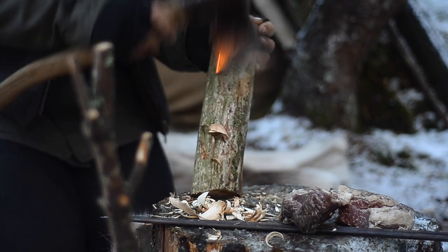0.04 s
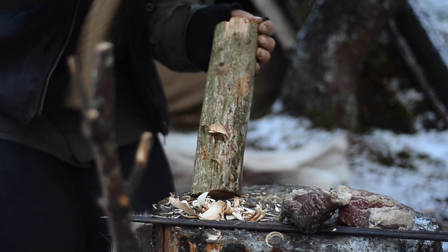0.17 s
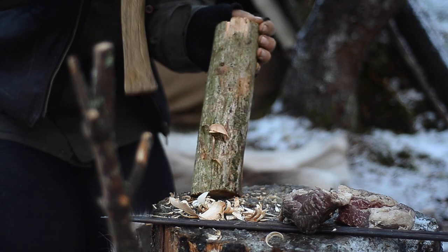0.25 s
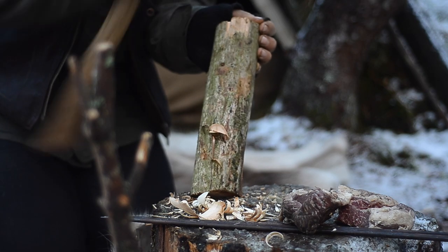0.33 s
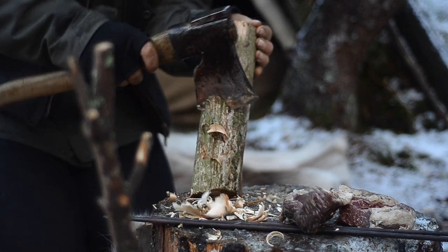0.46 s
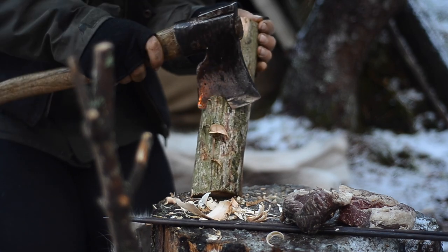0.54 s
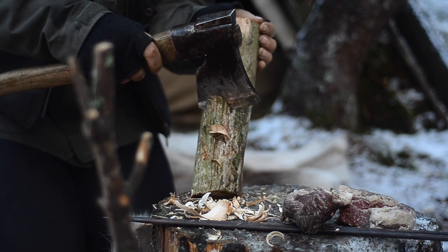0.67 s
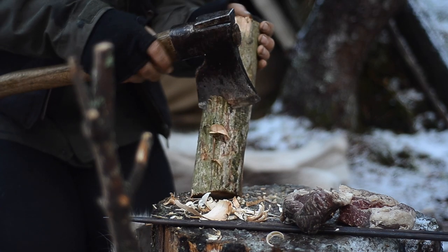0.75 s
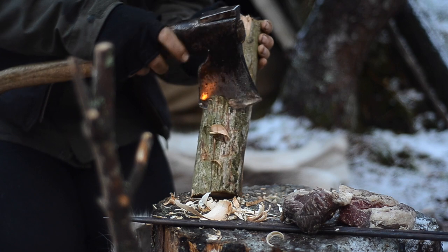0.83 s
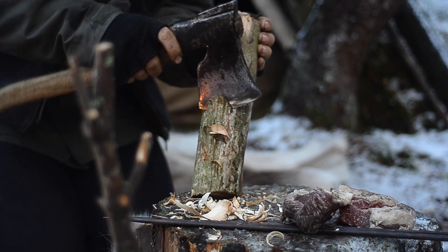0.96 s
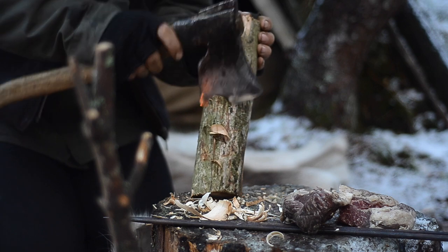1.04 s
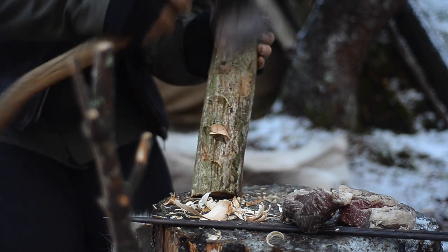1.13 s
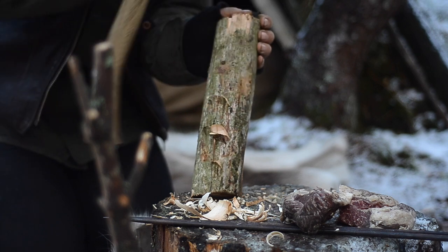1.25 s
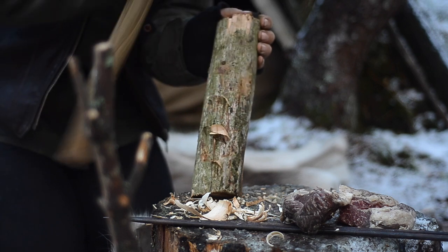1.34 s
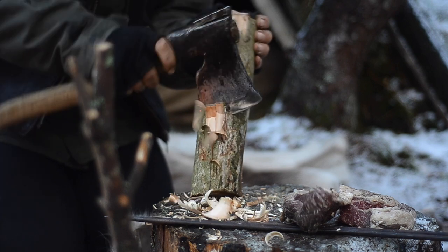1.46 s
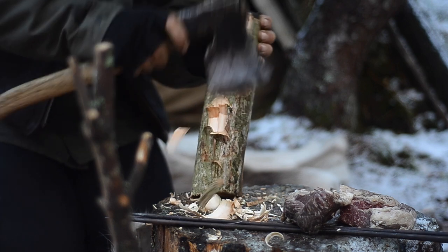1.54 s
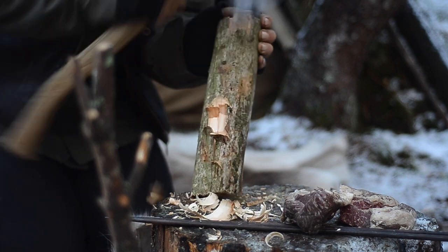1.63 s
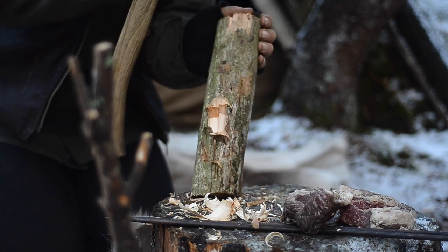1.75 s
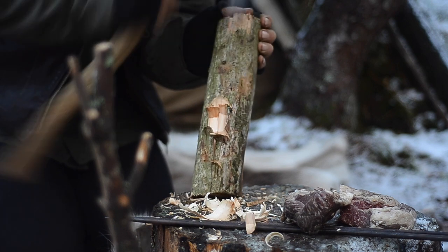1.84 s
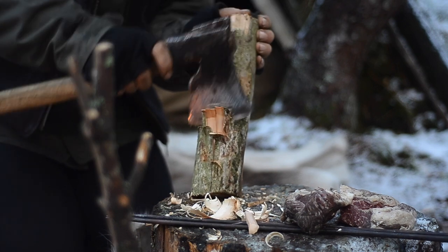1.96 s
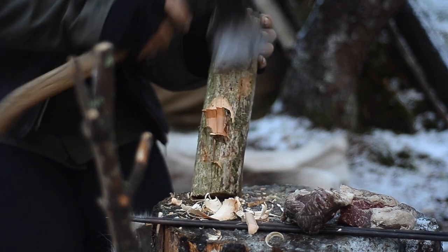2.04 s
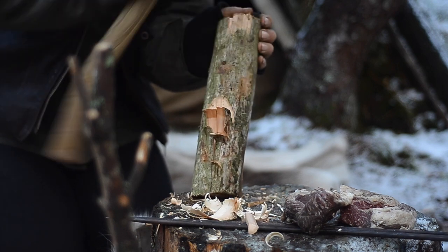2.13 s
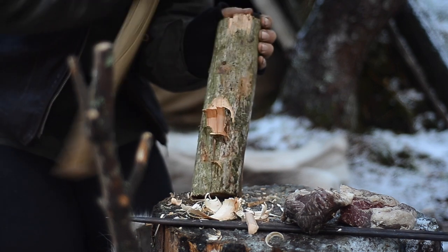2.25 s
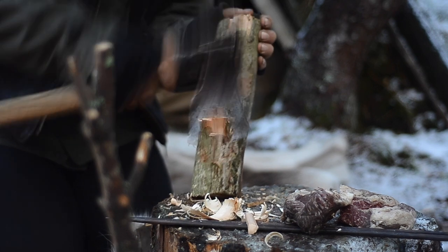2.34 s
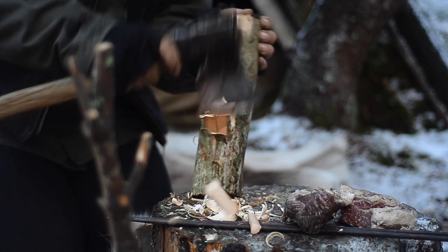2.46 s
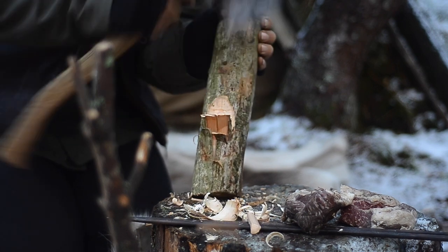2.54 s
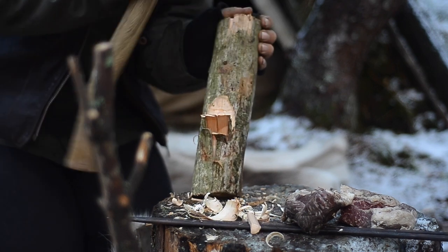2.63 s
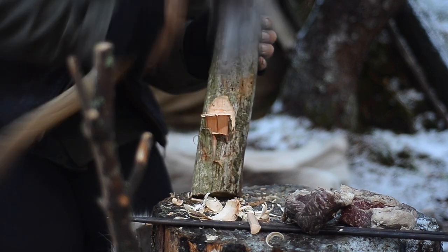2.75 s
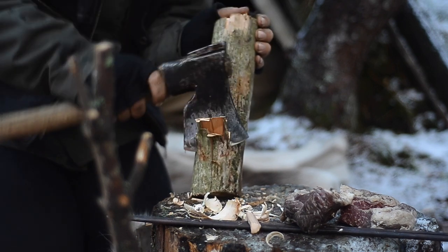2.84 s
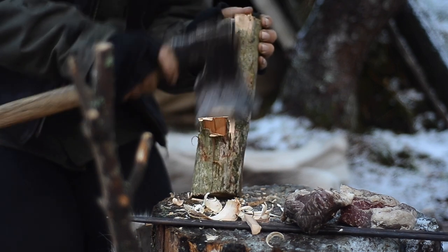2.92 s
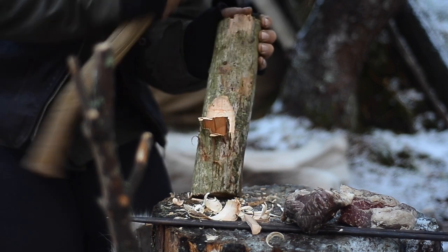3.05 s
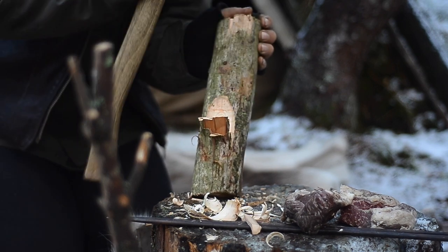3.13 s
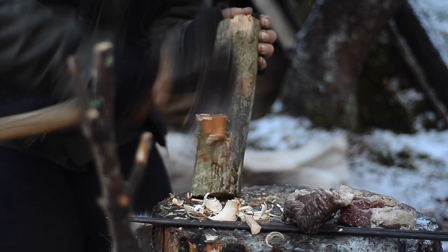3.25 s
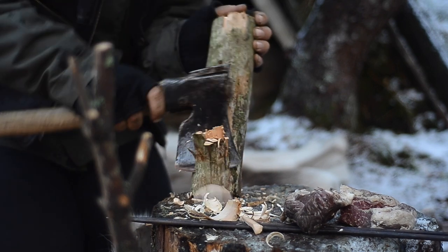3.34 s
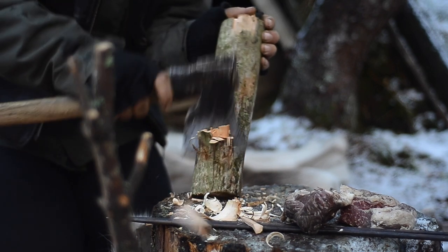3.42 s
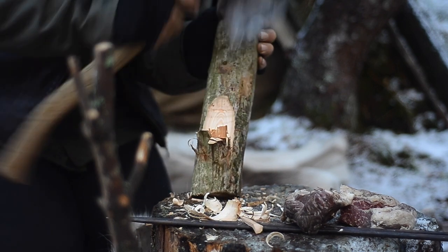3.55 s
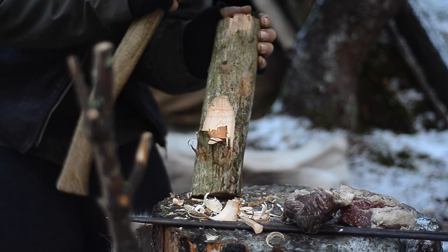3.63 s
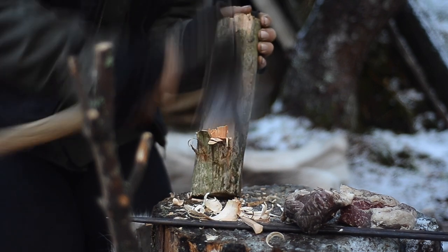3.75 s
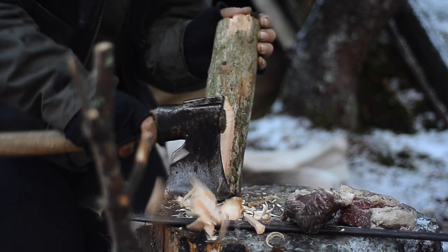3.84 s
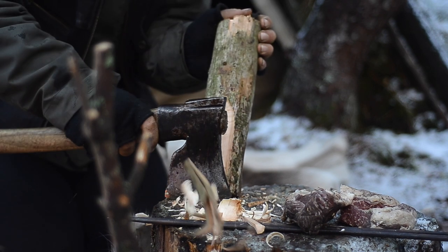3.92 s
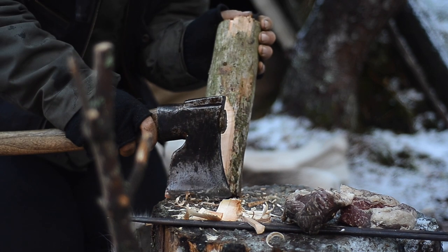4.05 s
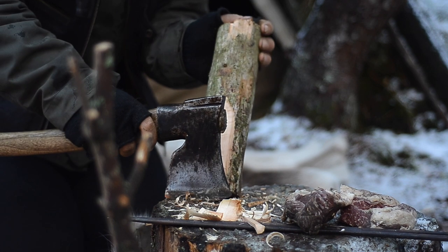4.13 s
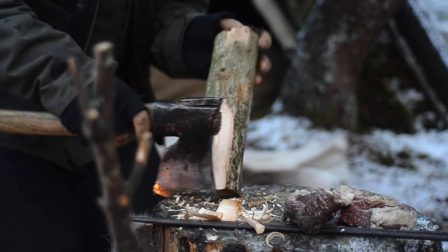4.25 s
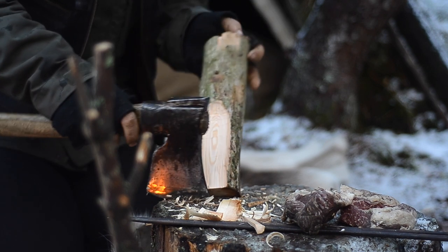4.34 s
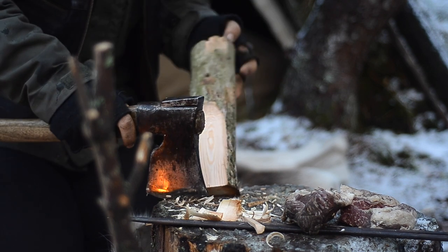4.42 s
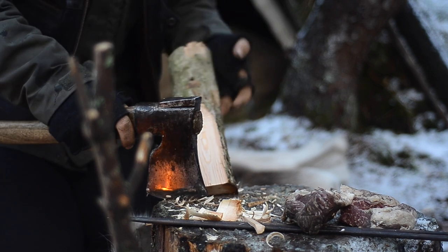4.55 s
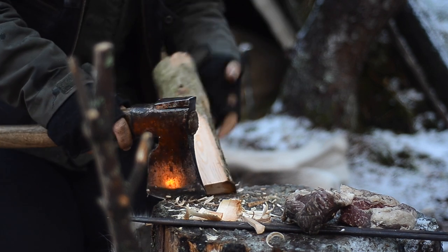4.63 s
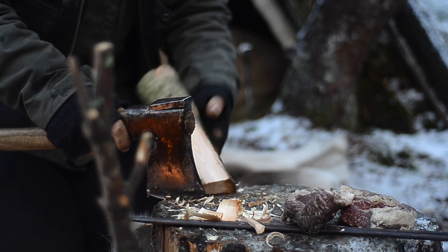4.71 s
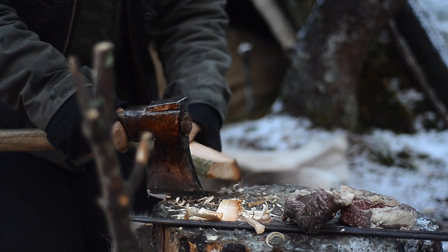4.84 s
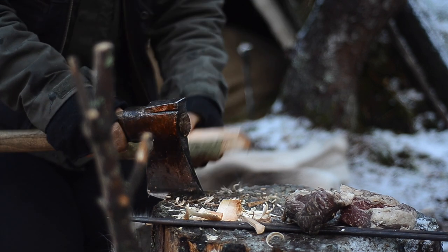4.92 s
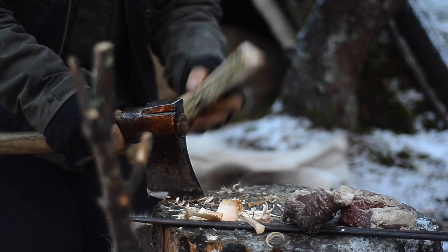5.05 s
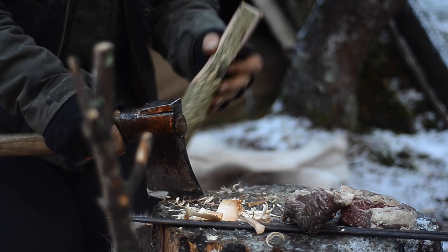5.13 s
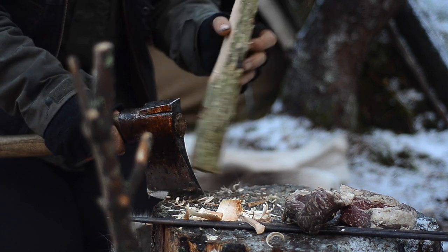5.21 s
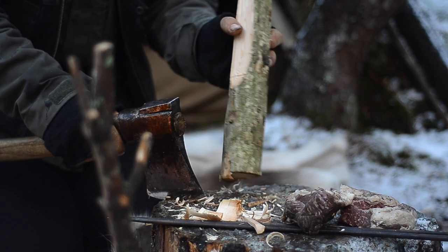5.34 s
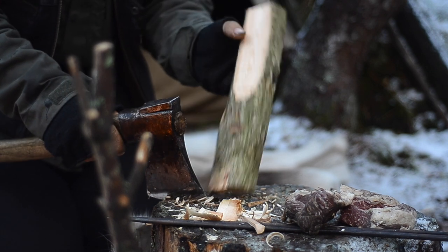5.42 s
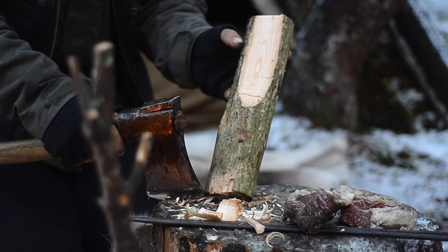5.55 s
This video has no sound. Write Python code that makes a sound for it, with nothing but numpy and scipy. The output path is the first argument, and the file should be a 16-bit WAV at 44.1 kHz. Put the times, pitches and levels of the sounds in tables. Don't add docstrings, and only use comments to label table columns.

```python
import sys
import numpy as np
from scipy import signal
from scipy.fft import rfft, irfft, next_fast_len
from scipy.io import wavfile
from scipy.ndimage import uniform_filter1d, minimum_filter1d, map_coordinates

SR = 44100
rng = np.random.default_rng(int(sys.argv[2]) if len(sys.argv) > 2 else 0)


def linear_from_db(decibels):
    return 10 ** (np.asarray(decibels, float) / 20)


def dump(signal):
    limited = np.clip(np.atleast_2d(signal).T, -1, 1)
    pcm = np.round(limited * 32767).astype(np.int16)
    wavfile.write(sys.argv[1], SR, pcm)


N = 246078
SPAN, SHORT = 28672, 6144

# (time [s], ground thump [dB], rattle [dB])
BLOW_EVENTS = [
    (0.082, -54, -48),
    (0.4565, -23, -26),
    (1.4879, -22.5, -25.5),
    (1.9510, -23.5, -26.5),
    (2.413, -25, -27),
    (2.858, -29.5, -26.5),
    (3.3282, -34, -27),
    (3.84, -34.5, -24),
    (3.86, -23.5, -30.5),
]
# (frequency [Hz], density [dB per Hz])
HISS_COLOUR = [(500, 1), (1500, 6.5), (3500, -2.5), (8000, -14.5), (12000, -18), (15000, -18.5),
               (16500, -31.5)]


def along(points, hz):
    f, v = np.transpose(points)
    return np.interp(np.log(hz + 1), np.log(f + 1), v)


def noise(spectrum, size):
    gain = linear_from_db(along(spectrum, np.fft.rfftfreq(size, 1 / SR)))
    x = irfft(rfft(rng.standard_normal(size)) * gain, size)
    return x / np.std(x)


def decay(t60_s, rise_s, size=SHORT):
    t = np.arange(size) / SR
    return (1 - np.exp(-t / abs(rise_s))) * linear_from_db(-60 * t / abs(t60_s))


def tone(hz, phase=0, size=SHORT):
    return np.sin(2 * np.pi * hz * np.arange(size) / SR + phase)


def wobble(rate_hz, size):
    knots = rng.standard_normal(int(size * rate_hz / SR) + 4)
    return map_coordinates(knots, [np.arange(size) * rate_hz / SR])


def add(track, s, sound):
    track[round(s * SR):][:len(sound)] += sound


def click(spectrum):
    cepstrum = irfft(np.log(linear_from_db(along(spectrum, np.fft.rfftfreq(SHORT, 1 / SR)))), SHORT)
    cepstrum[1:SHORT // 2] *= 2
    cepstrum[SHORT // 2:] = 0
    pulse = irfft(np.exp(rfft(cepstrum)), SHORT)
    return pulse / np.abs(pulse).max()


def crack(db, knock_db, bass_db, treble_db, t60_s):
    band = [(120, knock_db - 9.0), (600, knock_db + 12.0), (1030, bass_db + 4.0), (1750, bass_db + 16.0),
            (3000, 1), (4800, -1.5), (8500, treble_db + 7.5), (16000, treble_db - 5.5)]
    spike = np.interp(db, [-26, -8], [.4, 1])
    shape = linear_from_db(-6.0) * decay(t60_s * .5, 0.00018) + linear_from_db(-16.5) * decay(t60_s * 2.5, 0.00022)
    rattle = (1.5 - .8 * spike) * noise(band, SHORT) * shape
    return -linear_from_db(db + 5.0) * (spike * click(band) + rattle)


def air():
    # (time [s], far rush [dB], near hiss [dB])
    levels = [(0, -51.5, -65.5), (0.299, -52.5, -65), (.75, -52.5, -64), (1.0, -52.5, -65.5),
              (1.3, -53, -65), (1.8, -54, -62.5), (2.25, -54, -67), (2.499, -53.5, -64.5), (3.1, -54, -68),
              (3.7, -52.5, -71.5), (4.301, -54, -62), (4.9, -53.5, -64.5), (5.58, -53.5, -64.5)]
    # (frequency [Hz], density [dB per Hz])
    rush_colour = [(12, -18), (30, -6), (124, 1.5), (370, -3), (740, 0), (1100, -7.5), (2500, -25.5),
                   (6600, -90)]
    down_s, settle_s, lift_s, full_swing_db = .2, .12, .3, -40
    s, rush_db, hiss_db = np.transpose(levels)
    t = np.arange(N) / SR
    hits = [hit for hit, thump_db, _ in BLOW_EVENTS if thump_db > full_swing_db]
    swing = np.max([np.interp(t - hit, [-down_s, .07, 0.039 + settle_s], [0, 1, 0]) for hit in hits], axis=0)
    lift = sum(np.exp(-((t - hit - lift_s) / 0.33) ** 2) for hit in hits)
    rush_db = np.interp(t, s, rush_db) + 3 * swing + 3.5 + .9 * wobble(7, N)
    rush = linear_from_db(rush_db) * noise(rush_colour, N)
    sparks = (rng.random(N) < 45 / SR) * linear_from_db(8 * rng.random(N))
    crackle = 1 + .7 * np.convolve(sparks, decay(.008, .0002)[:600])[:N]
    hiss_db = np.interp(t, s, hiss_db) + 7.5 * swing + 1.5 * np.minimum(lift, 1) + 3 + 1.1 * wobble(5.3, N)
    return rush + linear_from_db(hiss_db) * noise(HISS_COLOUR, N) * crackle


def embers():
    per_s, base_db, spread_db = 45, -62, 6
    out, draw = np.zeros(N + SHORT), rng.random((300, 4))
    times = np.cumsum(-np.log(draw[:, 0]) / per_s)
    for s, (_, pitch, size, life) in zip(times, draw):
        if s < N / SR:
            hz = 3000 * 4 ** pitch
            level_db = base_db - spread_db * np.log(size) / 2
            t60_s = (2.5 + 30 * life ** 3) / hz
            add(out, s, linear_from_db(level_db) * tone(hz, size=512) * decay(t60_s, .00003, size=512))
    return out[:N]


def fire():
    # (time [s], peak [dB], treble [dB])
    snaps = [(0.0108, -35, -17), (.496, -31, -14), (.633, -37, -5), (0.759, -32.5, -16), (.982, -43.5, -21),
             (1.2364, -45, -2), (1.3982, -42, -12), (1.6761, -45, -18), (1.6933, -33, -10),
             (2.0776, -29.5, -8.5), (2.1093, -37, -21.5), (2.7744, -43, 7.5), (3.037, -37.5, -4.5),
             (3.1045, -38.5, -22), (3.2325, -38, -16.5), (3.468, -31, -18), (3.966, -34, -12),
             (3.4978, -39.5, -33), (3.5957, -35, -23), (4.3075, -45, -14), (4.348, -27.5, -7),
             (4.3577, -40, -18), (4.4329, -36.5, -14.5), (4.572, -43, -4), (4.708, -38.5, -13),
             (4.8, -42, -9), (5.043, -35, -15), (5.0791, -30, -16), (5.112, -38, -10.5),
             (5.3237, -40.5, -26)]
    # (time [s], peak [dB])
    ticks = [(0.2652, -45), (0.5999, -49), (0.701, -50), (0.8325, -44.5), (0.881, -53.5), (0.9554, -56.5),
             (1.1074, -54), (1.1444, -54), (1.2795, -49), (1.7958, -41), (2.2079, -47.5), (3.087, -46.5),
             (3.1487, -48.5), (3.2894, -51), (2.151, -49), (2.191, -51), (2.642, -41), (3.638, -39),
             (4.203, -47), (3.7468, -43), (4.6705, -56.5), (4.778, -41.5), (4.8191, -47), (4.877, -48.5),
             (4.9075, -52), (5.229, -48), (5.2527, -43), (5.2765, -48)]
    out = np.zeros(N + SPAN)
    for s, db, treble_db in snaps:
        add(out, s + .0007, crack(db, -12.5, -7, treble_db, 0.0062))
    for s, db in ticks:
        add(out, s + .0007, crack(db - 2, -30, -13, -10.5, 0.006))
    return out[:N]


def rubs():
    # (time [s], level [dB], length [s])
    scrapes = [(0.081, -38, 0.005), (1.208, -49, 0.021), (1.611, -42.5, .009), (2.843, -54, 0.0067),
               (4.067, -43, 0.0056), (4.085, -44.5, 0.01), (4.214, -40.5, 0.018), (4.231, -41, 0.011),
               (4.287, -43, 0.012), (4.298, -45.5, 0.013), (5.547, -42.5, 0.0097), (5.5646, -49, 0.0052)]
    # (time [s], level [dB], pitch [Hz], length [s])
    squeaks = [
        (4.675, -53, 1750, .025),
        (4.738, -49, 1710, .032),
    ]
    out, t = np.zeros(N + SPAN), np.arange(SHORT) / SR
    for s, db, length_s in scrapes:
        stroke = np.sin(np.pi * np.clip(t / length_s, 0, 1))
        add(out, s, linear_from_db(db + 5.3 * wobble(340, SHORT)) * noise(HISS_COLOUR, SHORT) * stroke)
    for s, db, hz, length_s in squeaks:
        stroke = np.sin(np.pi * np.clip(t / length_s, 0, 1))
        add(out, s, linear_from_db(db) * tone(hz, 1.7 * wobble(103, SHORT)) * stroke)
    return out[:N]


def pings():
    # (time [s], peak [dB], pitch [Hz])
    splinter_pings = [(.4965, -25, 4050), (.603, -50, 11500), (.586, -54, 10000), (.736, -49, 3800),
                      (.778, -48, 3400), (.909, -47, 3300), (1.022, -50, 3700), (1.123, -55, 7500),
                      (1.19, -52, 5200), (1.221, -48, 8500), (1.221, -46, 3500), (1.255, -53, 8300),
                      (1.717, -34, 754), (1.7375, -48, 4300), (1.7375, -53, 8000), (2.4652, -25, 1250),
                      (2.686, -40, 3500), (2.686, -39, 1910), (3.4385, -36, 4400), (3.447, -30, 3250),
                      (3.498, -45, 4000), (3.6472, -28, 2500), (3.695, -32.5, 1200), (4.3075, -34, 5100),
                      (4.41, -50, 8000), (4.423, -50, 10500), (4.475, -55, 9800), (4.48, -50, 4270),
                      (4.49, -52, 6500), (4.519, -44, 3490), (4.793, -52, 10460), (5.325, -41, 1500),
                      (5.425, -50, 3500)]
    out = np.zeros(N + SPAN)
    for s, db, hz in splinter_pings:
        add(out, s, linear_from_db(db) * tone(hz) * decay(15 / hz, .0001))
    return out[:N]


def chips():
    # (time [s], peak [dB], knock [dB], bass [dB], treble [dB])
    landings = [(0.505, -26.5, -14, -14.5, -19), (1.2101, -29, -27, -9, -15), (1.6135, -31, -14, -13, -28),
                (1.716, -29, 12, 8, -21), (1.7612, -31, -7.5, -3.5, -32), (2.0301, 0.5, -11, -6.5, -23),
                (2.0384, -22.5, 5, -5, -20), (2.4652, -18.5, -0.5, -12, -8), (2.5415, -28.5, 9.5, -3, -29),
                (2.6343, -34, 5.5, -1, -19), (2.818, -23.5, -11, -14, -14), (3.4376, -21, -11, 4, -23),
                (3.4461, -30, -13, -12.5, -11.5), (3.5751, -1.5, -8.5, -9, -15),
                (3.6218, -4, -13.5, -10.5, -21.5), (3.5841, -27, -11, -10, -25),
                (3.6302, -32, -14.5, -5, -25), (3.624, -15, -23, -8, -4), (3.6464, -24, -35, -7, -21),
                (3.696, -26, -6, -9.5, -35), (3.819, -28.5, -9.5, -16, -25), (4.0693, -18.5, 3, -5, -14),
                (4.092, -24, 11, -14, -10.5), (4.1699, -23.5, -17, -18.5, -25),
                (4.5096, -21.5, -36, -14, -16), (5.5183, -28, 12, -18, -35.5),
                (5.5767, -23.5, -6, -10, -19)]
    out = np.zeros(N + SPAN)
    for s, *colour_db in landings:
        add(out, s + .0007, crack(*colour_db, 0.0064))
    return out[:N]


def splinters():
    under_rattle_db, mean_delay_s, lowest_hz, t60_s = -9.5, .045, 1000, 0.38
    out = np.zeros(N + SPAN)
    for s, _, rattle_db in BLOW_EVENTS:
        for wait, pitch, size in rng.random((50, 3)):
            delay_s = .012 - mean_delay_s * np.log(1 - wait)
            hz = lowest_hz * 6 ** pitch
            level_db = rattle_db + under_rattle_db - 4 * np.log(1 - size) - 60 * delay_s / t60_s
            add(out, s + delay_s, linear_from_db(level_db) * tone(hz, size=512) * decay(5 / hz, .00005, size=512))
    return out[:N]


def trees(x):
    # (frequency [Hz], t60 [s])
    fading = [(200, 0.22), (2000, 0.058), (10000, 0.17)]
    hz, t, z = signal.stft(rng.standard_normal(SR // 2), SR, nperseg=256)
    tail = signal.istft(z * linear_from_db(-60 * t / along(fading, hz)[:, None]), SR, nperseg=256)[1]
    return signal.fftconvolve(np.pad(x, (150, 0)), tail / np.linalg.norm(tail))[:N]


def ground():
    # (frequency [Hz], level [dB], arrival [s], spread [s])
    waves = [(57, -1.5, .0750, .045), (105, -4, .0570, .022), (85, -5, .1080, .018), (60, -12, .1430, .03),
             (175, -7, .0360, .012), (75, -6, .0300, .015), (95, -20, .1900, .03), (53, -26, .2750, .07)]
    # (frequency [Hz], density [dB per Hz])
    rattle_colour = [(120, -31), (200, 4.5), (459, -13.5), (775, -3.5), (2600, -10), (4470, -19),
                     (7550, -28.5), (15000, -46)]
    out, t = np.zeros(N + SPAN), np.arange(SPAN) / SR
    for s, thump_db, rattle_db in BLOW_EVENTS:
        start = linear_from_db(thump_db) * decay(4.3, .0037, size=SPAN)
        for hz, db, arrival_s, spread_s in waves:
            packet = np.exp(-((t - arrival_s) / spread_s) ** 2) * np.cos(2 * np.pi * hz * (t - arrival_s))
            add(out, s, linear_from_db(db + 1.5 * wobble(30, SPAN)) * packet * start)
        grain_db = 1.2 * wobble(70, SPAN) + 2.8 * wobble(500, SPAN)
        resonances = linear_from_db(3.5 * wobble(700, SPAN // 2 + 1))
        loose = irfft(rfft(noise(rattle_colour, SPAN)) * resonances, SPAN)
        loose = loose / np.std(loose) * decay(0.31, 0.0048, size=SPAN)
        add(out, s, linear_from_db(rattle_db - 2.5 + grain_db) * loose)
    return out[:N]


def creaks():
    # (time [s], level [dB], pitch [Hz], t60 [s])
    splits = [(.472, -18.5, 800, .04), (0.506, -36, 1700, .06), (.535, -29.5, 766, 0.087),
              (1.538, -35, 900, 0.055), (1.4, -29, 1200, 0.036), (1.614, -27, 1165, 0.034),
              (1.7155, -25, 970, 0.023), (1.966, -21, 1400, .03), (1.998, -32, 830, .05),
              (2.429, -33, 1200, .05), (2.876, -23.5, 1700, 0.047), (2.905, -38, 1590, .1),
              (3.357, -27, 1900, .08), (3.358, -24, 1490, .04), (3.38, -31.5, 1850, 0.18),
              (3.4375, -18, 1360, 0.026), (3.853, -13.5, 1900, 0.025), (3.876, -18, 910, 0.037),
              (3.905, -37.5, 1800, 0.1)]
    out = np.zeros(N + SPAN)
    for s, db, hz, t60_s in splits:
        rough_db = 5 * wobble(420, SHORT)
        add(out, s, linear_from_db(db + rough_db) * tone(hz, 1.8 * wobble(330, SHORT)) * decay(t60_s, .003))
    return out[:N]


def lone_modes():
    # (time [s], level [dB], pitch [Hz], t60 [s])
    rings = [
        (.529, -44, 6622, .3),
        (.556, -46, 6622, .26),
        (3.934, -58, 4630, .5),
        (3.934, -44, 2875, .12),
        (3.94, -46, 3400, .09),
        (3.91, -50, 5905, .16),
        (2.484, -40, 4048, .06),
    ]
    out = np.zeros(N + SPAN)
    for s, db, hz, t60_s in rings:
        add(out, s, linear_from_db(db + wobble(60, SPAN)) * tone(hz, size=SPAN) * decay(t60_s, 0.0016, size=SPAN))
    return out[:N]


def steel():
    # (time [s], ring [dB], then poll, cheek, edge modes against it [dB])
    freed = [
        (0.5277, -47, 9.5, -3, -6),
        (0.553, -46, 8, -13, -5),
        (1.559, -46.5, 11.5, -4, 3),
        (2.044, -61.5, 13, 6, 9),
        (2.4819, -39, 2, -6, -13),
        (2.924, -40, 5.5, -4, -5),
        (3.3941, -38.5, -6.5, -3, 8.5),
        (3.908, -36, -16, -17, -0.5),
        (3.936, -48, 10, -14, 4.5),
    ]
    # (time [s], level [dB])
    swing_back = [
        (.5520, -39.5),
        (1.5585, -52),
        (2.044, -56),
        (2.4824, -36),
        (2.925, -51),
        (3.3945, -57.5),
        (3.9072, -46),
    ]
    # (frequency [Hz], level [dB], t60 [s])
    body = [(7390, 0, .18), (7870, -14, .12), (8180, -18, .28), (5910, -5, .14), (8420, -12, .1)]
    poll = [(2880, -10, .12), (3290, -9, .08), (3690, -13, .15), (4050, -5, .13), (4590, -3, .07),
            (4630, -28, .45), (4985, -8, .09)]
    cheek = [(6622, 0, .15)]
    edge = [(8786, -4, .1), (9830, -16, .2), (10430, -21, .14), (12340, -19, .2), (12810, -14, .09),
            (13250, -19, .1), (15370, -24, .14)]
    eye = [(11320, -17, .9)]
    rings = [(s, db, eye) for s, db in swing_back]
    for s, db, *family_db in freed:
        for family, extra_db in zip([body, poll, cheek, edge], [0] + family_db):
            rings.append((s, db + extra_db, family))
    out = np.zeros(N + SPAN)
    brushing = decay(.6, .0001, size=SPAN)
    for s, db, family in rings:
        for hz, mode_db, t60_s in family:
            size = SPAN if t60_s > .4 else SPAN // 3
            flutter = 2 * (7000 / hz) ** .3 * wobble(150, size) * brushing[:size]
            level_db = db + mode_db + rng.normal(0, 1) + flutter
            ring = tone(hz, 0.2 * flutter, size=size) * decay(t60_s, 0.0014, size=size)
            add(out, s, linear_from_db(level_db) * ring)
    rasp_colour = [(1500, 0.0), (4000, 6.0), (9000, -15.0), (15000, -11.0)]  # (Hz, dB)
    for s, db, *_ in freed:
        add(out, s, linear_from_db(db + 1.5) * noise(rasp_colour, SHORT) * decay(0.054, 0.00063))
    return out[:N]


def fibres():
    # (time [s], level [dB], centre [Hz], t60 [s], treble an octave up [dB])
    tears = [(0.46, 1, 1900, 0.015, -10.5), (.4595, 11, 3700, 0.012, -16), (1.4881, 1, 1600, 0.021, -11.5),
             (1.49, 10.5, 3900, 0.012, -14.5), (1.5076, -16, 1410, .012, -5),
             (1.9515, 6.5, 3900, 0.019, -16.5), (1.958, 5.5, 4010, 0.0048, -17),
             (1.969, -21, 3200, .03, -21.5), (2.4005, -0.5, 2600, 0.018, -18.5),
             (2.4114, 10, 4450, 0.0072, -21), (2.416, -2.5, 3000, 0.027, -14.5),
             (2.855, 1.5, 3000, 0.028, -10), (2.8640, 8.5, 3300, 0.011, -17.5),
             (2.871, 2, 4100, 0.0062, -9), (2.882, -17.5, 3600, 0.018, -14), (3.3285, 11, 1880, 0.022, -8),
             (3.34, -6, 2900, 0.035, -14.5), (3.842, 5, 2590, 0.02, -11.5),
             (3.8480, -4, 2010, 0.033, -12.5), (3.863, -4.5, 1700, 0.011, -18.5),
             (3.8654, -0.5, 2600, 0.0082, -14.5), (.085, -24, 3500, 0.013, -13),
             (5.5423, -27, 2800, 0.021, -11), (5.52, -36.5, 3200, 0.029, -17)]
    out = np.zeros(N + SPAN)
    for s, db, hz, t60_s, treble_db in tears:
        band = [(hz / 4, -11), (hz, 0), (hz * 2, treble_db), (hz * 4, treble_db - 13.5), (18000, -34)]
        spiky_db = db - 8.0 + 2.6 * wobble(590, SHORT)
        add(out, s, linear_from_db(spiky_db) * noise(band, SHORT) * decay(t60_s, 0.0005))
    return out[:N]


def slaps():
    # (time [s], level [dB], pitch [Hz], t60 [s])
    hits = [(0.4599, -2, 1900, .012), (1.4872, 3, 819.5, 0.028), (1.4894, 2, 1149, .015),
            (1.5075, -16.5, 1250, 0.014), (2.3997, 6, 830, 0.026), (2.411, 0, 1450, .015),
            (2.4113, -3, 4550, 0.0093), (2.8547, 9, 811, .024), (2.8553, -3, 1499, .015),
            (3.3282, 3.5, 946, 0.013), (3.3291, 3.5, 1833, .018), (3.343, -10, 2810, .012),
            (3.8416, 5, 1216, 0.013), (3.8684, 4, 762, .02)]
    out = np.zeros(N + SPAN)
    for s, db, hz, t60_s in hits:
        add(out, s, linear_from_db(db) * tone(hz) * decay(t60_s, 0.00026))
    return out[:N]


def thuds():
    # (time [s], level [dB], pitch [Hz], t60 [s])
    hits = [(0.087, -15.5, 320, 0.043), (0.1007, -13.5, 306, 0.015), (0.457, -8.5, 104, 0.11),
            (.4600, 0.5, 366, 0.02), (1.4876, -5.5, 105.5, 0.046), (.458, -5, 1276, 0.017),
            (1.488, 1.5, 1156, 0.023), (2.411, -3, 4580, 0.012), (3.330, -6, 2020, 0.022),
            (3.845, -3.5, 1600, 0.021), (4.0695, -21, 760, 0.015), (4.0915, -27.5, 622, 0.018),
            (4.3492, -27, 1102, 0.016), (5.543, -35, 4890, 0.017), (1.4900, -4.5, 341, 0.028),
            (1.9610, -12, 124, .03), (2.4224, -4, 135, 0.021), (2.857, -11, 75.4, 0.072),
            (2.8933, -11.5, 139, 0.039), (2.868, -14.5, 148, 0.055), (3.3520, -9, 128.4, 0.046),
            (3.8430, -7.5, 3330, 0.049), (3.8648, 1, 156.5, 0.027), (5.5174, -25, 497, 0.011),
            (5.5215, -18.5, 190, 0.022), (5.5400, -33.5, 99.3, 0.21), (5.5785, -16.5, 150, 0.046)]
    out = np.zeros(N + SPAN)
    for s, db, hz, t60_s in hits:
        add(out, s, linear_from_db(db) * tone(hz) * decay(t60_s, 0.0011))
    return out[:N]


def log():
    # (time [s], level [dB], pitch [Hz], t60 [s])
    knocks = [(0.4567, 12.5, 821.5, 0.022), (.4605, 0.5, 787, .033), (1.4872, 5, 819, .022),
              (1.488, 7, 1484, 0.012), (1.4915, 5.5, 636, 0.012), (1.4975, -6, 676, 0.02),
              (1.9485, -18.5, 506, 0.023), (1.9497, 3.5, 1172, 0.011), (1.954, -2, 1493, .015),
              (1.9520, 12, 847, 0.019), (2.3997, -3.5, 825.5, .03), (2.41, 6.5, 800, 0.02),
              (2.4126, 7.5, 1150, 0.012), (2.4220, 1.5, 845, 0.0078), (2.855, 1, 805, 0.021),
              (2.8570, 2, 1518, .02), (3.3288, -5, 1108, .018), (3.3290, 1.5, 1640, 0.012),
              (3.3330, 0, 810, 0.022), (3.3351, -0.5, 1300, 0.017), (3.342, -13, 1200, 0.036),
              (3.350, -8, 780, 0.022), (3.8416, 1.5, 1190, .016), (3.8430, 7.5, 887, .018),
              (3.8470, 3, 721, .02), (3.8476, 6.5, 1380, 0.014), (3.8637, -3, 1500, .01),
              (3.8659, 6.5, 1020, 0.0087), (3.8685, -3.5, 690, .018), (3.868, -0.5, 900, .014)]
    # (time [s], level [dB], pitch [Hz], t60 [s])
    taps = [
        (0.0852, -3.5, 650, 0.0081),
        (0.089, -24.5, 1150, 0.02),
        (5.542, -24, 993, 0.021),
    ]
    # (ratio to pitch [1], level [dB])
    modes = [(1, 1), (1.361, -1.5), (1.76, -5.5), (0.451, -9.5), (.7, -16), (2.3, -7), (3, -19.5),
             (4.101, -17.5)]
    out = np.zeros(N + SPAN)
    for sign, contacts in [(1, knocks), (-1, taps)]:
        for s, db, hz, t60_s in contacts:
            for ratio, mode_db in modes:
                level = sign * linear_from_db(db + mode_db + rng.normal(0, 1))
                add(out, s, level * tone(hz * ratio) * decay(t60_s / max(ratio, 1) ** 0.89, 0.00062))
    return out[:N]


def scene():
    blows = log() + thuds() + fibres() + creaks()
    cracks = chips() + fire() + rubs() + embers() + slaps() + pings() + lone_modes()
    echo = linear_from_db(-26.5) * trees(blows) + linear_from_db(-18.0) * trees(cracks)
    mono = blows + cracks + echo + ground() + steel() + air() + splinters()
    return np.array([mono, mono])


def parting(x):
    # (frequency [Hz], side level under the sound [dB])
    apart = [(60, -29.5), (400, -27), (1300, -22), (2400, -12.5), (4400, -11.5), (8000, -12.5),
             (15000, -6.5), (16000, -61)]
    # (time [s], level [dB])
    parted = [
        (.4575, -16),
        (2.861, -9),
        (3.867, -4.5),
    ]
    share, quiet_db, recover_s = .5, -36, .09
    hz, t, z = signal.stft(x, SR, nperseg=1024)
    band = np.minimum(3.2 * np.log(hz / 300 + 1), 12).astype(int)
    field = uniform_filter1d(rng.standard_normal((13, len(t))), size=9, axis=1)
    field = uniform_filter1d(field, size=3, axis=0)
    field = field - .25 * (np.arange(13) < 5)[:, None]
    calm = linear_from_db(quiet_db) > np.sqrt(2 * np.sum(np.abs(z) ** 2, axis=0))
    span = round(recover_s / t[1])
    calm = minimum_filter1d(calm * 1., size=span, origin=(span - 1) // 2)
    gate = (field[band] > np.quantile(field, 1 - share)) * calm
    gate = gate + sum(linear_from_db(db) * (np.abs(t - s) < t[1] / 2) for s, db in parted)
    turn = np.exp(2j * np.pi * rng.random(z.shape))
    return signal.istft(z * turn * gate * linear_from_db(along(apart, hz))[:, None], SR, nperseg=1024)[1][:N]


def top_cut(x):
    return signal.sosfilt(signal.butter(12, 16200, fs=SR, output="sos"), x)


def record(dry):
    # (frequency [Hz], width [Hz], gain [dB])
    housing = [(2440, 2000, -5), (3400, 4900, 4.5), (5740, 720, -14), (8180, 870, 6.5)]
    low_hz, top_hz, ceiling = 40, 15900, .995
    m = next_fast_len(N + SPAN)
    hz = np.fft.rfftfreq(m, 1 / SR)
    colour = 1j * hz / (low_hz + 1j * hz)
    for centre_hz, width_hz, db in housing:
        stiff, damped = centre_hz ** 2 - hz ** 2, 1j * hz * width_hz
        colour = colour * (stiff + damped * linear_from_db(db)) / (stiff + damped)
    edge = signal.cheby2(12, 50, top_hz + 400, fs=SR, output="sos")
    coloured = irfft(rfft(dry[0], m) * colour, m)[:N]
    x = np.clip(signal.sosfilt(edge, coloured), -ceiling, ceiling)
    side = parting(x)
    return top_cut(x + np.array([side, -side]))


dry = scene()
out = record(dry)
dump(out)
```